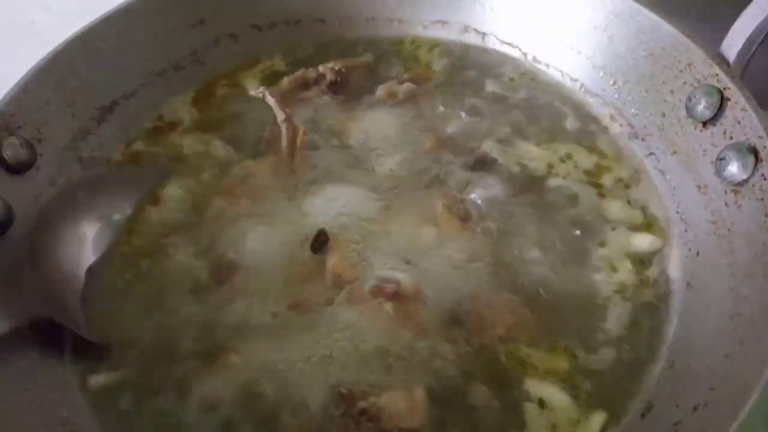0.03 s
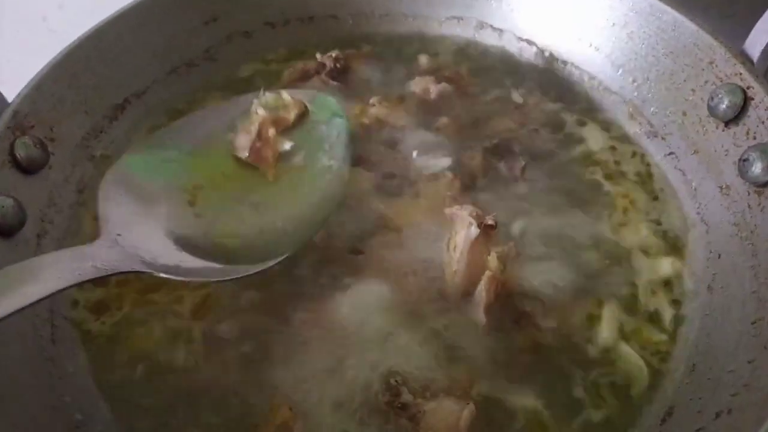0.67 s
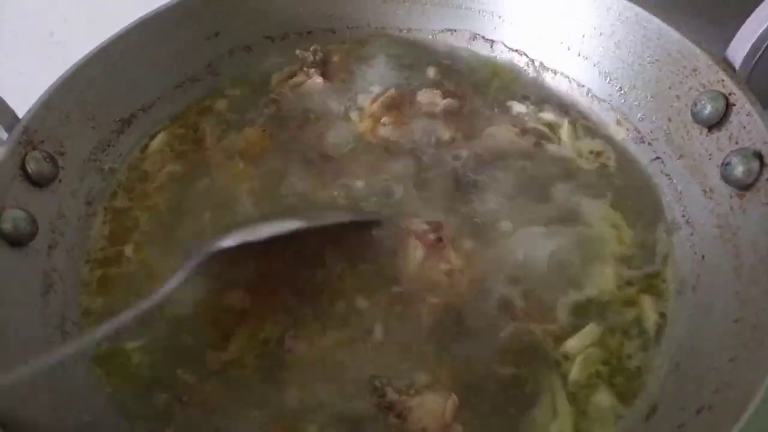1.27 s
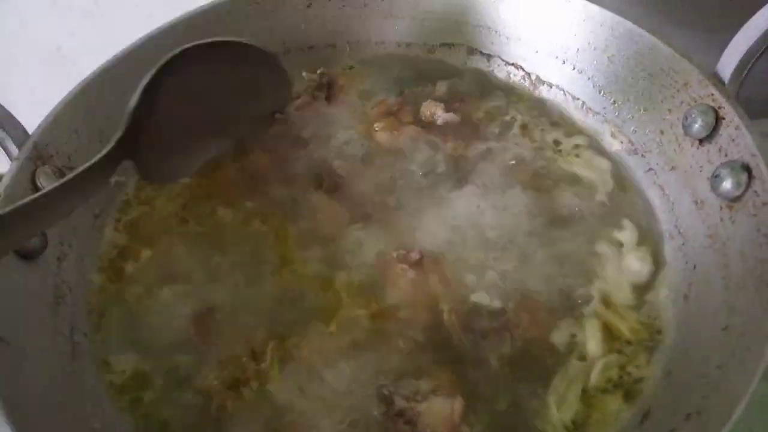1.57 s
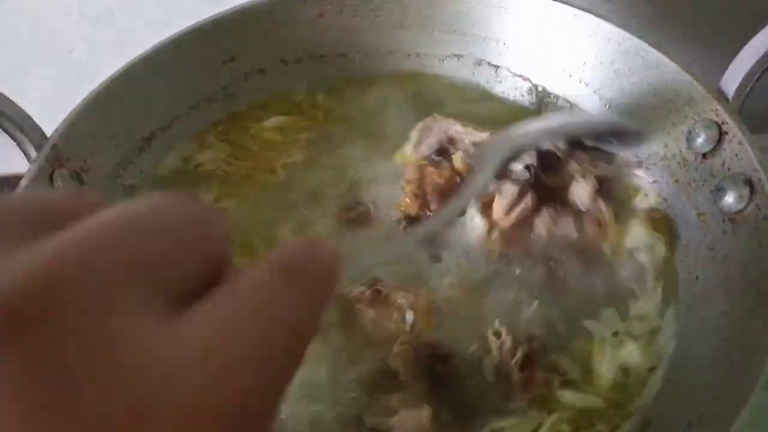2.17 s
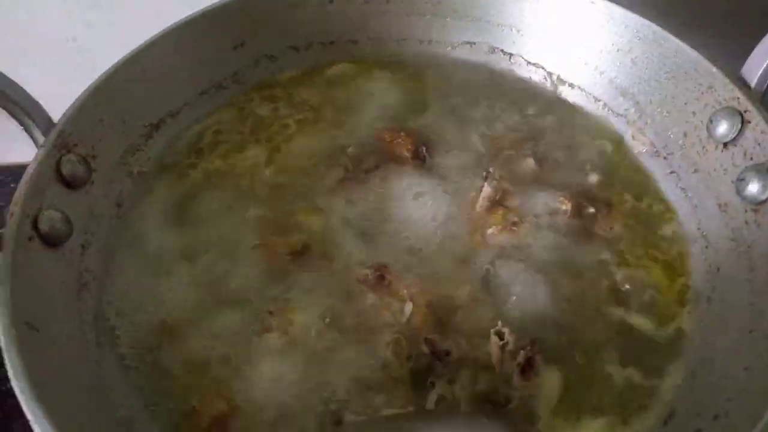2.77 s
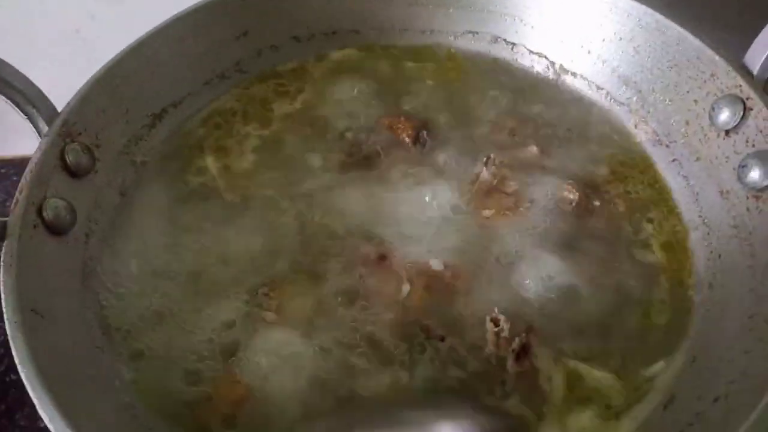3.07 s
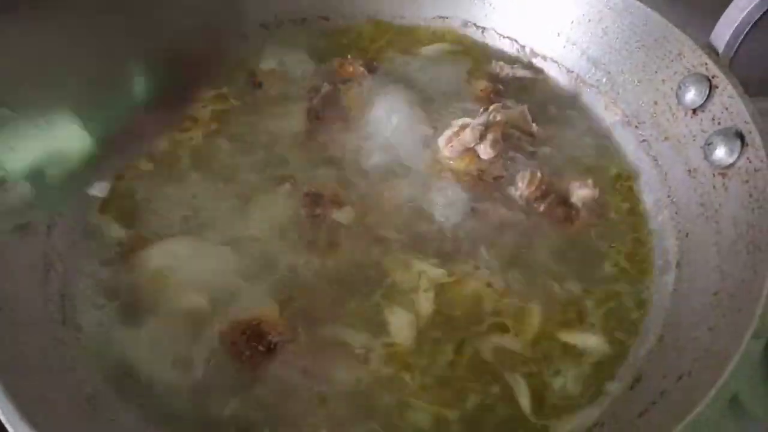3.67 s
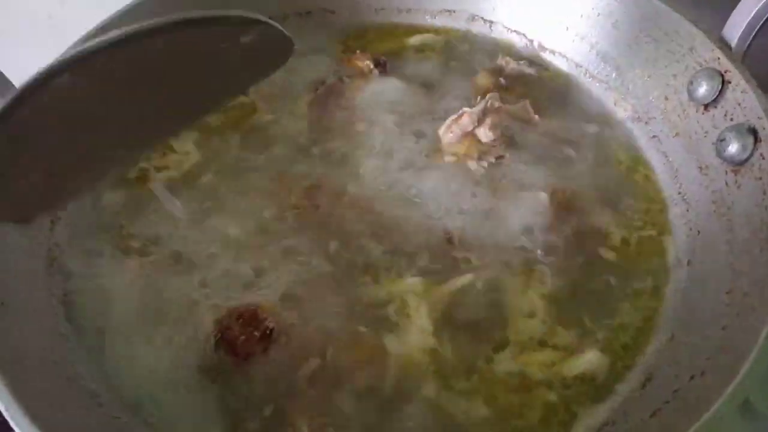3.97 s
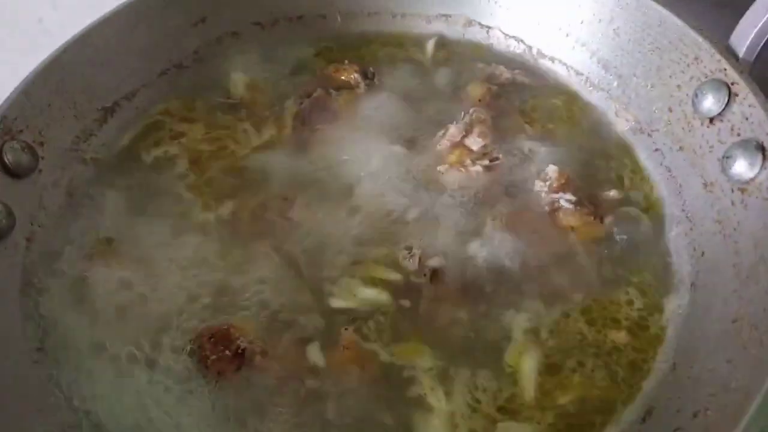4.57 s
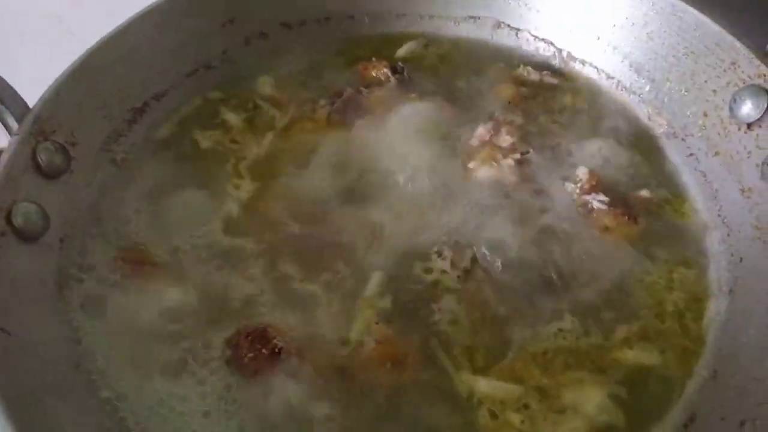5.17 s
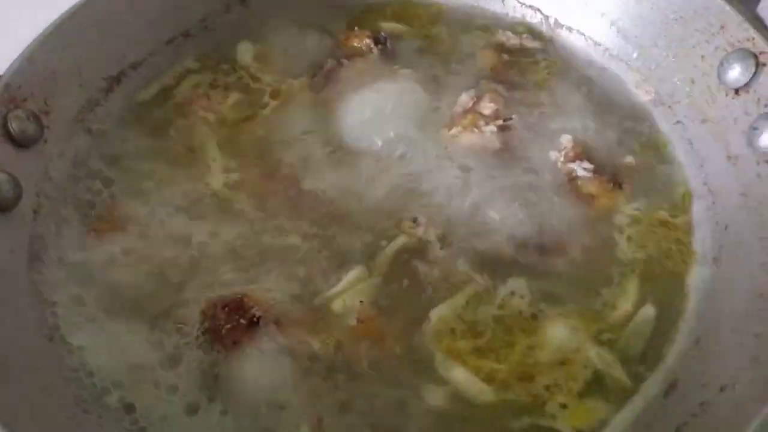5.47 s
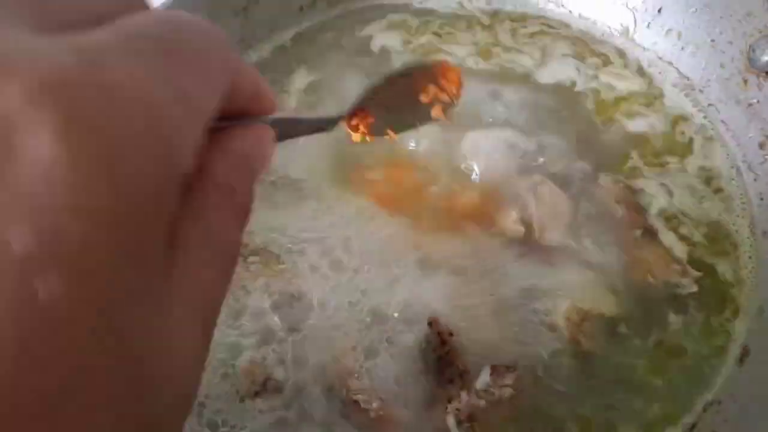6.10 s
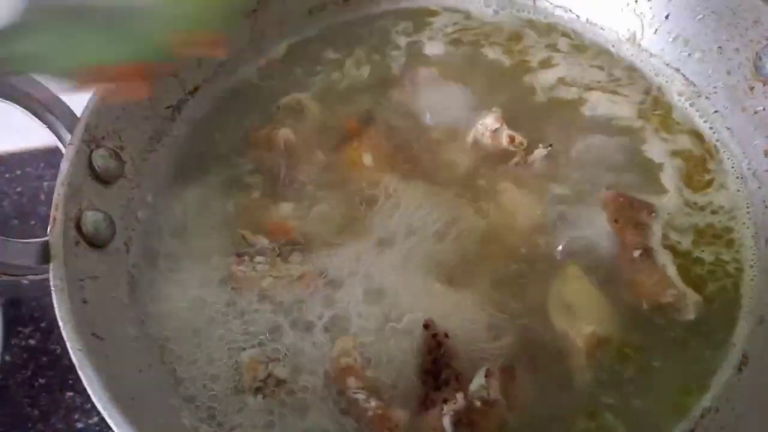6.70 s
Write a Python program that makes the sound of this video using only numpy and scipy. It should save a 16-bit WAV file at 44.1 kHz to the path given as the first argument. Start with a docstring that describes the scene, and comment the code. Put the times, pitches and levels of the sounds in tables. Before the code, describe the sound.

A low, churning bubble of soup boiling in a metal pan runs throughout, heard close up, with fizzing foam, small snaps and wet plops on top. Things are nudged quietly on the kitchen worktop. Past the middle comes the loudest sound, a metal spoon clanking down, followed by a lighter ringing utensil clatter. Faint distant chirps slide downward a few times, and a click starts a short low buzz near the end.

```python
"""Broth boils hard in a wide metal pan in a small kitchen: big steam bubbles rumble, fine foam fizzes and ticks, surface bubbles plop.
Beside the stove things are shifted about, a metal spoon is put down with a clank and another utensil clatters.
A few faint falling chirps come from further off, and near the end something buzzes briefly."""
import sys
import numpy as np
from scipy import signal
from scipy.fft import rfft, irfft, next_fast_len
from scipy.io import wavfile
from scipy.ndimage import uniform_filter1d

SR = 44100
rng = np.random.default_rng(int(sys.argv[2]) if len(sys.argv) > 2 else 0)


def bounce(signal):
    """Save signal as a 16-bit WAV file at the path given by the first command-line argument."""
    frames = np.transpose(np.atleast_2d(signal))
    limited = np.clip(frames, -1, 1)
    pcm = np.round(limited * 32767).astype(np.int16)
    wavfile.write(sys.argv[1], SR, pcm)


N = 306054

# vigour of the boil, as the level of its rumble: (s, dB)
BOIL = [(0.0, -62), (0.45, -58), (0.6, -61.5), (0.8, -57.5), (0.9, -65), (1.02, -56.5), (1.28, -59), (1.42, -66), (1.48, -56), (1.73, -62), (1.98, -55.5), (2.3, -59.5), (2.4, -65.5), (2.47, -58.5),
        (2.66, -63.5), (2.9, -58), (3.0, -61.5), (3.25, -60), (3.68, -61), (4.25, -57), (4.75, -59.5), (5.5, -61), (6.38, -57.5), (6.7, -70), (6.94, -78)]
# level of the foam's fizz: (s, dB)
FOAM = [(0.0, -68), (0.42, -72), (1.7, -66.5), (1.95, -71.5), (2.3, -67), (2.75, -69.5), (3.15, -67), (3.72, -71.5), (4.2, -69), (5.93, -67.5),
        (6.3, -67.5), (6.6, -66), (6.94, -71.5)]
# colours: (Hz, dB per Hz)
RUMBLE = [(30, -39), (55, -28.5), (85, -10.5), (115, -10.5), (140, -1), (178, 4.5), (203, -8.5), (235, -0.5), (275, -16.5), (330, -35), (600, -47.5), (1200, -84)]
FIZZ = [(1470, -51), (2500, -22), (3400, -23.5), (4500, -19.5), (5270, -3), (6500, 1.5), (7830, -7), (10200, -1.5), (11600, -4), (15200, -16), (16000, -6.5)]
FLAME = [(25, 15.5), (60, 19.5), (300, 7.5), (700, 2.5), (1500, -1), (3000, -3.5), (8000, -11.5), (16000, -13)]
# a clank's colour: (Hz, dB per Hz)
CLANK = [(50, -33), (130, -16), (290, -5), (480, -9.5), (650, -9.5), (1100, -15), (1450, -11), (2150, -11.5), (2900, -13), (3400, -7), (3800, -3.5), (4150, -15.5), (4900, -5), (7700, -8.5), (10500, -8.5), (16000, -18)]
CLATTER = [(240, -56), (400, -36), (512, -8.5), (742, -35), (949, -32), (994, -25), (1930, 2), (2290, -8.5),
           (3120, -13), (6440, 3), (7750, -14), (10500, -3.5), (16000, -7.5)]
# the loudest snaps in the foam: (s, peak dB, pitch Hz)
TICKS = [(0.1486, -47.5, 6400), (0.2633, -44.5, 5560), (0.2833, -49, 10600), (0.399, -51.5, 9800), (0.612, -42.5, 7300), (0.682, -47, 6550), (0.7063, -50, 6500), (0.9622, -54, 6100), (0.9792, -48, 11300), (1.1044, -45, 6700), (1.2441, -44.5, 9900),
         (1.3219, -52, 6600), (1.3568, -48, 5780), (1.5469, -43.5, 6600), (1.7509, -43.5, 6800), (1.9116, -49, 6600), (2.213, -43.5, 6500), (2.3511, -46, 6500),
         (2.4106, -43.5, 6550), (2.4229, -50, 6550), (2.5681, -51, 10100), (2.798, -47, 5830), (2.8389, -47, 7000), (2.9133, -46.5, 8800), (3.0071, -46.5, 6600), (3.1662, -48, 5570), (3.3827, -49, 6200),
         (4.0028, -54, 6630), (4.1046, -49, 6230), (4.185, -47, 7000), (4.964, -44, 5440), (5.1111, -51, 6310), (5.2837, -48.5, 6150), (5.3291, -49, 6160),
         (5.5835, -48.5, 6700), (5.8165, -48, 10150), (6.0973, -42.5, 9430), (6.5044, -39, 6050), (6.585, -46, 5750), (6.628, -45, 10700), (6.65, -45, 5560), (6.859, -44.5, 10170)]
# surface bubbles opening: (s, peak dB, pitch Hz)
PLOPS = [(0.184, -57.5, 1170), (0.193, -61.5, 1250), (0.203, -66, 1020), (0.589, -74.5, 1260), (1.169, -68, 1300), (1.41, -69.5, 1300), (1.746, -47, 1356),
         (1.782, -55, 1570), (2.442, -63.5, 1430), (2.46, -69, 1370), (3.286, -63, 905), (4.054, -57, 714), (5.078, -71, 1060), (6.537, -40.5, 1066), (6.61, -67, 880)]
# dishes shifted on the worktop: (s, length s, thud dB, note Hz, note dB, scrape dB)
SCUFFS = [(1.034, 0.13, -70, 453, -71, -78), (1.777, 0.0045, -63, 780, -68, -56), (1.789, 0.015, -62, 760, -64, -63), (2.043, 0.02, -65.5, 784, -66.5, -71), (2.068, 0.085, -68, 1310, -64.5, -67.5),
          (2.246, 0.016, -74, 800, -62, -67), (3.037, 0.026, -66, 480, -55.5, -52.5), (3.129, 0.11, -79, 1110, -65.5, -59.5),
          (3.801, 0.015, -74, 370, -67, -79), (3.923, 0.14, -69, 460, -79, -84), (4.024, 0.065, -54.5, 684, -78, -65),
          (4.298, 0.24, -58.5, 1120, -91, -60.5), (4.555, 0.011, -51.5, 1790, -55, -54.5), (4.584, 0.048, -55, 637, -62.5, -59.5), (4.81, 0.033, -65, 740, -57.5, -47),
          (4.962, 0.01, -54.5, 970, -83, -47.5), (5.074, 0.012, -58, 1060, -63, -57), (5.16, 0.1, -69, 557, -68.5, -71), (5.336, 0.038, -75, 1060, -68.5, -87), (5.399, 0.018, -56.5, 725, -72, -89),
          (5.657, 0.099, -70, 1110, -93, -69)]
# contacts of the spoon: (s, peak dB, brightness Hz, decay of the contact s)
SPOON_HITS = [(1.7825, -48.5, 6100, 0.0071), (4.209, -38, 9000, .003), (4.211, -22, 14000, 0.0029), (4.2124, -19.5, 15000, 0.0025), (4.2175, -22, 12000, 0.0015), (4.2313, -25, 1200, 0.0063), (4.2376, -26.5, 1004, 0.0045),
              (4.289, -40.5, 5000, 0.0057), (4.35, -42, 4500, 0.0079)]
# contacts of the second utensil: (s, peak dB, brightness Hz, decay of the contact s)
UTENSIL_HITS = [(4.785, -35, 9350, 0.0053), (4.792, -33.5, 12900, 0.0025), (4.803, -36.5, 9980, 0.0061), (4.810, -37.5, 14000, 0.011), (4.816, -41, 14300, 0.0064), (4.8215, -29.5, 8900, 0.0057)]
# the spoon's modes: (Hz, t60 s, dB)
SPOON_MODES = [(263, .08, -10), (480, 0.14, -6), (794, 0.16, -5.5), (1100, .13, -4), (1130, 0.092, -12), (1136, 0.095, 1), (1579, 0.12, -7), (1914, 0.089, -7.5), (2220, 0.15, -6.5),
               (3180, 0.13, -16), (3640, 0.13, -9), (3674, 0.23, -16.5), (3920, .17, -15), (4260, 0.075, -12.5), (4740, 0.14, -15), (4930, .18, -14), (5170, 0.13, -11.5), (5346, 0.18, -7.5), (5620, .16, -20), (6550, 0.1, -6.5), (7670, 0.11, -10.5), (8000, 0.15, -14.5),
               (8670, 0.12, 1), (8970, .16, -7), (9350, .12, -13.5), (10150, 0.081, -5.5), (10225, 0.24, 0.5), (11250, 0.12, -7.5), (11200, 0.17, -10), (11740, .12, -8.5), (14145, .09, -3.5), (15230, .13, -7.5)]
# the second utensil's modes: (Hz, t60 s, dB)
UTENSIL_MODES = [(760, 0.16, -23), (1950, 0.37, -11), (1974, 0.29, -6), (2150, 0.18, -9), (2616, 0.041, 2.5), (3910, 0.15, -5), (4985, 0.09, 1), (5450, 0.069, 1.5), (6010, 0.061, -10), (6600, 0.085, 6.5), (7080, 0.057, 1),
                 (7220, 0.14, -8), (8980, 0.32, -1.5), (9700, .12, -3), (10500, .17, -3.5), (11100, 0.21, 1), (11600, .1, -4.5), (13200, .12, -13), (14700, .1, -11)]
# distant chirps: (s, length s, start Hz, end Hz, level dB)
CHIRPS = [(2.253, 0.09, 5450, 2864, -58.5), (5.324, 0.094, 3770, 2390, -73.5), (5.659, 0.11, 3800, 2310, -71), (5.937, 0.075, 4010, 2595, -67.5)]
# the buzz's partials: (multiple, dB)
BUZZ_PARTIALS = [(1, -0.5), (2, -8.5), (3, -18), (4, -16.5), (5, -24)]
BUZZ_RATTLE = [(385, 190, -18.5), (575, 16, -28.5), (800, 74, -33), (1060, 19, -30)]   # (Hz, half width Hz, dB)
BUZZ_HZ, BUZZ_CLICK_S = 58.5, 6.024
KITCHEN_T60_S = 0.33
CUTOFF_HZ = 15900   # fixed
TIME = np.arange(N) / SR
BLUB_COLOUR = [(150, -23), (280, 4), (360, 2), (470, -4.5), (600, -11.5), (800, -22.5), (1500, -48), (4000, -74.5)]
# their resonances: (Hz, width Hz, dB)
DISH_MODES = [(1080, 190, -4), (1641, 130, -3.5), (1934, 65, -7), (2187, 220, -3.5), (2920, 320, -4), (3800, 110, -4), (4700, 320, -4.5)]
# dull bumps through the worktop: (s, level dB)
BUMPS = [(2.155, -79), (3.214, -61.5), (4.04, -54), (4.089, -58), (4.213, -53), (4.226, -45), (4.569, -51.5), (4.61, -52), (5.187, -60.5), (5.692, -60), (6.514, -57.5), (6.69, -63.5)]
# big bubbles that stand out of the churn: (s, peak dB, pitch Hz)
GLUGS = [(0.04, -52, 157), (0.047, -59, 348), (0.09, -65, 495), (0.4, -51, 173), (0.762, -62, 340), (0.766, -52, 220.7), (1.035, -50, 338), (1.041, -55, 184), (1.093, -55.5, 330), (1.17, -57, 199), (1.2, -67, 480),
         (1.47, -52, 228), (1.554, -46.5, 177.4), (1.649, -53.5, 234), (1.814, -55, 169), (1.84, -61, 476), (1.929, -56, 236), (2.047, -64, 495), (2.111, -47.5, 192), (2.246, -61, 514), (2.852, -57, 200),
         (3.038, -66, 501), (3.048, -51.5, 440), (3.097, -60, 430), (3.313, -53.5, 196), (3.358, -59, 346), (3.455, -58.5, 212), (3.804, -46.5, 217.5), (3.808, -53.5, 330), (3.878, -58.5, 343), (3.894, -52.5, 231),
         (4.341, -56, 172), (4.523, -51, 149.6), (4.56, -55, 550), (4.6, -58, 308), (4.845, -51, 170), (4.979, -52.5, 213), (5.079, -61, 397), (5.096, -56, 207), (5.17, -55, 362), (5.188, -69, 510), (5.213, -66, 447), (5.666, -64, 402), (5.795, -58.5, 163.5), (5.937, -55.5, 148), (6.068, -52, 298)]
SURGES_PER_S, SURGE_DB = 14, 1.36   # the boil heaves at random about its mean
BLUBS_DB, BLUBS_FOLLOW, BLUBS_SURGE_DB = -80.5, 0.24, 0.5   # smaller bubbles: level at mean vigour, share of the boil's swing, own surges
SMALL_TICKS_PER_S, SMALL_TICK_DB, SMALL_TICK_SPREAD_DB = 13, 12.5, 1   # lesser snaps come at random, their peaks this far over the foam
SMALL_TICK_HZ, SMALL_TICK_SPREAD_OCTAVES = 7640, 0.51
# the worktop's modes: (Hz, t60 s, dB)
WORKTOP_MODES = [(73.4, .12, -16.5), (111.5, 0.089, -8), (132.5, 0.27, 5.5), (163, 0.17, 1)]
BUZZ_START_S, BUZZ_ATTACK_S, BUZZ_STOP_S, BUZZ_RELEASE_S, BUZZ_DB = 6.004, 0.014, 6.375, 0.022, -50.5
# the level dips briefly
DIP_S, DIP_RECOVERY_S, DIP_DB = 5.999, .02, -20   # fixed
TICK_DECAY_S = 0.00095
TICK_DB = -3   # strength of every snap against its listed peak
# a dish is touched lightly and clinks; its modes: (Hz, t60 s, dB)
CLINK_S, CLINK_MODES = 3.808, [(1270, .25, -75), (1310, 0.17, -79), (1870, 0.072, -77), (1900, 0.092, -66.5), (1900, .09, -82)]
# level of the sizzle that comes in spurts below the fizz: (s, dB)
SIZZLE = [(0, -83), (.11, -81), (.2, -100), (.33, -87.5), (.5, -101.5), (.78, -88), (.95, -99), (1.24, -83.5), (1.5, -84), (1.68, -86), (1.97, -91), (2.2, -77),
          (2.7, -84), (3.0, -83), (3.25, -77), (3.45, -82), (3.75, -101), (3.92, -76), (4.1, -80), (4.5, -74.5), (5.2, -76), (5.4, -77), (5.9, -78.5), (6.15, -74), (6.26, -84.5), (6.55, -79.5), (6.94, -86)]
SIZZLE_COLOUR = [(2600, -28.5), (3300, -4), (3700, -4.5), (4300, -2.5), (4900, 1), (5600, -6.5), (7000, -43)]
# level of the bursting films' soft crackle: (s, dB)
CRACKLE = [(0, -84), (.3, -96), (.5, -99), (.95, -99), (1.1, -101), (1.42, -86.5), (1.6, -89), (1.95, -107), (2.4, -87.5), (2.9, -95.5), (3.4, -85), (3.7, -92.5),
           (5.2, -85), (5.9, -89.5), (6.15, -86), (6.6, -81), (6.94, -86.5)]
CRACKLE_COLOUR = [(400, 9), (800, -1), (1300, -5.5), (2200, -5.5), (3200, -5.5), (4500, -10)]
GLUG_DB, GLUG_SWELL_CYCLES = -3.5, 2.6   # strength of every glug against its listed peak; it swells for this many cycles
SMALL_GLUGS_PER_S, SMALL_GLUG_LOW_HZ, SMALL_GLUG_HIGH_HZ = 14, 220.7, 473   # lesser glugs come at random
SMALL_GLUG_DB, SMALL_GLUG_DB_PER_OCTAVE, SMALL_GLUG_SPREAD_DB = 1, -14.5, -0.5   # the lowest peak this far over the boil, higher ones are weaker
CONTACT_ATTACK_S = .0007   # a contact presses home this fast
BUZZ_WAVER_DB, BUZZ_WAVERS_PER_S = 2.5, 12   # each partial's level is unsteady
CHIRP_RASP = 1.0   # fixed
FIZZ_DULL_HZ = 12400   # after the dip the fizz loses its top above this
FOAM_SWELL_DB = 1.2   # fixed


def from_db(db):
    """Decibels to gain."""
    return 10 ** (np.asarray(db) / 20)


def rms_one(x):
    """Scale to unit rms."""
    return x / np.sqrt(np.mean(x ** 2) + 1e-20)


def level(rows):
    """Gain over time from rows of (s, dB)."""
    return from_db(np.interp(TIME, *np.transpose(rows)))


def colour(x, spectrum):
    """Give a white sound a smooth spectrum, keeping its power; minimum phase, so nothing sounds early."""
    half, (hz, db) = next_fast_len(N // 2 + SR // 10), np.transpose(spectrum)
    gain = rms_one(from_db(np.interp(np.log(np.linspace(1, SR / 2, half + 1)), np.log(hz), db)))
    cepstrum = irfft(np.log(gain))
    cepstrum[1:half] *= 2
    cepstrum[half + 1:] = 0
    return irfft(rfft(x, 2 * half) * np.exp(rfft(cepstrum)))[:N]


def band(x, low_hz, high_hz):
    """Band-pass that keeps the power of white noise."""
    edges = np.clip([low_hz, high_hz], 10, .45 * SR)  # fixed
    return signal.sosfilt(signal.butter(2, edges, "band", fs=SR, output="sos"), x + 1e-18) * np.sqrt(SR / 2 / (edges[1] - edges[0]))


def drift(rate):
    """Slow random wander of spread 1."""
    knots = rng.standard_normal(int(rate * N / SR) + 2)
    return rms_one(np.interp(TIME * rate, np.arange(len(knots)), knots))


def ring(clicks, hz, t60):
    """A unit click sets a sine of height 1 ringing."""
    r, w = np.exp(-np.log(1000) / (t60 * SR)), 2 * np.pi * hz / SR
    return signal.lfilter([0, np.sin(w)], [1, -2 * r * np.cos(w), r * r], clicks + 1e-18)


def add(track, s, sound):
    """Mix a short sound into a track at time s."""
    at = round(s * SR)
    track[at:at + len(sound)] += sound[:N - at]


def diffuse(x, t60):
    """Countless echoes or close modes: a dense dying tail of the same energy."""
    t = TIME[TIME < t60]
    tail = rng.standard_normal(len(t)) * np.exp(-np.log(1000) * t / t60)
    return signal.oaconvolve(x, tail / np.linalg.norm(tail))[:N]


def bubbles(per_s, low_hz, high_hz, cycles, spread_db, clump_db, count=24):
    """Bubbles are born in random clumps, each ringing a few cycles at its own pitch; flat spectrum, rms 1."""
    born = np.flatnonzero(rng.random(N) < per_s * from_db(clump_db * drift(25)) / SR)
    sizes = from_db(spread_db * np.minimum(rng.exponential(1, N), 4.5)) * rng.choice([-1, 1], N)
    dealt, out = rng.integers(0, count, N), np.zeros(N)
    for k, hz in enumerate(np.geomspace(low_hz, min(high_hz, .45 * SR), count)):
        clicks = np.zeros(N)
        clicks[born] = sizes[born] * (dealt[born] == k)
        out += hz * ring(clicks, hz, cycles / hz)
    return rms_one(out)


def rolling_boil(pan_hz=179, pan_width_hz=12, churn_db=3):
    """Large steam bubbles keep up a heaving churn and make the pan drone; smaller ones blub above it, following its vigour."""
    vigour, surge = level(BOIL), drift(SURGES_PER_S)
    churn = colour(bubbles(per_s=520, low_hz=70.8, high_hz=330, cycles=16.1, spread_db=2, clump_db=2, count=30), RUMBLE)
    churn = churn + from_db(-5.0) * signal.lfilter(*signal.iirpeak(pan_hz, pan_hz / pan_width_hz, fs=SR), churn)
    churn = churn / np.sqrt(uniform_filter1d(churn ** 2, size=2400) + 1e-12)
    blubs = colour(bubbles(per_s=330, low_hz=268.5, high_hz=773, cycles=85, spread_db=3.5, clump_db=2.5), BLUB_COLOUR)
    blub_gain = from_db(BLUBS_DB + BLUBS_SURGE_DB * drift(SURGES_PER_S)) * (vigour / vigour.mean()) ** BLUBS_FOLLOW
    return from_db(SURGE_DB * surge) * (vigour * churn + blub_gain * rms_one(blubs))


def foam():
    """Tiny bubbles crackle, high and thin, over a smooth hiss; duller after the dip."""
    grains = bubbles(per_s=1900, low_hz=4680, high_hz=15000, cycles=20, spread_db=4.5, clump_db=2.5)
    grains = signal.sosfilt(signal.butter(4, 4200, "high", fs=SR, output="sos"), grains)
    hiss = from_db(2.0) * rng.standard_normal(N) * from_db(2.0 * drift(45) + FOAM_SWELL_DB * drift(6.5))
    fizz = rms_one(colour(grains + hiss, FIZZ))
    dull = signal.sosfilt(signal.butter(2, min(FIZZ_DULL_HZ, .45 * SR), fs=SR, output="sos"), fizz)
    return level(FOAM) * np.where(TIME < DIP_S, fizz, dull)


def ticks(snap_db=-3, ring_db=-5, attack_s=0.0005, low_share=0.82, high_share=1.3):
    """A film snaps: a very short, thin crack around its own pitch, with a brief ring."""
    out, t = np.zeros(N), TIME[:700]
    shape = (1 - np.exp(-t / attack_s)) * np.exp(-t / TICK_DECAY_S)
    for s, db, hz in list(TICKS) + small_ticks():
        crack = shape * (from_db(snap_db) * band(rng.standard_normal(len(t)), hz * low_share, hz * high_share) + from_db(ring_db) * np.sin(2 * np.pi * hz * t))
        add(out, s, from_db(db + TICK_DB) * crack * np.linalg.norm(shape) / np.linalg.norm(crack))
    return signal.sosfilt(signal.butter(6, 4400, "high", fs=SR, output="sos"), out + 1e-18)


def plops(swell_s=0.0014, close_s=0.00057, rise_per_s=45, wet_db=-19, wet_s=0.014):
    """A dome tears open: its cavity note swells and climbs as the hole widens; the film then splashes back."""
    out, t = np.zeros(N), TIME[:3000] - TIME[350]
    for s, db, hz in PLOPS:
        phase = 2 * np.pi * np.cumsum(hz * np.exp(rise_per_s * np.minimum(t, .004))) / SR
        shape = 1.74 / (np.exp(-t / swell_s) + np.exp(t / close_s))
        splash = band(rng.standard_normal(len(t)), hz * 0.72, hz * 1.12) * (t > 0) * np.exp(-np.abs(t) / wet_s)
        add(out, s - .0062, from_db(db) * (shape * np.sin(phase) + from_db(wet_db) * splash))
    return out


def scuffs():
    """Dishes bump and slide on the worktop: gritty contact rings a hollow note and their modes, heard both
    close by and through the room."""
    out, t = np.zeros(N), TIME[:SR // 2]
    for s, length, thud_db, note_hz, note_db, scrape_db in SCUFFS:
        grit = rng.standard_normal((3, len(t))) * np.exp(-(t / length) ** 2)
        thud = from_db(thud_db) * band(grit[0], 240, 473)
        note = from_db(note_db) * band(grit[1], note_hz * 0.894, note_hz * 1.13)
        scrape = sum((-1) ** k * from_db(db + scrape_db - 9.0) * resonate(grit[2], hz, width) for k, (hz, width, db) in enumerate(DISH_MODES))
        add(out, s, thud + note + scrape)
    return from_db(-6.5) * out + from_db(-7.5) * diffuse(out, KITCHEN_T60_S)


def struck_metal(hits, modes, spectrum, crack_db, ring_db, wash_db, wash_t60, room_db):
    """Each contact gives a rough crack and rings the modes; softer contacts are duller."""
    cracks, clicks, t = np.zeros(N), np.zeros(N), TIME[:3000]
    for s, db, bright_hz, crack_s in hits:
        soft = signal.butter(2, min(bright_hz, .45 * SR), fs=SR)
        add(cracks, s, from_db(db) * signal.lfilter(*soft, rng.standard_normal(len(t)) * (1 - np.exp(-t / CONTACT_ATTACK_S)) * np.exp(-t / crack_s)))
        add(clicks, s, from_db(db) * signal.lfilter(*soft, t == 0))
    cracks = colour(cracks, spectrum)
    rings = sum((-1) ** k * from_db(db + ring_db) * ring(clicks, hz, t60) for k, (hz, t60, db) in enumerate(modes))
    near = from_db(crack_db) * cracks + rings + from_db(wash_db) * diffuse(cracks, wash_t60)
    walls = signal.sosfilt(signal.butter(2, 7500, fs=SR, output="sos"), near)   # the walls swallow the top
    return near + from_db(room_db) * diffuse(walls, KITCHEN_T60_S)


def chirps(rough=0.038, direct_db=-0.5, room_db=-2.5):
    """Short, broken, raspy falling chirps, smeared by the walls."""
    out = np.zeros(N)
    for s, length, start_hz, end_hz, db in CHIRPS:
        u = np.minimum(TIME[:SR // 5] / length, 1)
        hz = (end_hz + (start_hz - end_hz) * (1 - u) ** 1.6) * (1 + rough * band(rng.standard_normal(len(u)), 50, 390))
        rasp = rms_one(1 + CHIRP_RASP * band(rng.standard_normal(len(u)), 30, 270))
        add(out, s, from_db(db) * rasp * np.sqrt(np.abs(np.sin(np.pi * u ** 0.85))) * np.sin(2 * np.pi * np.cumsum(hz) / SR))
    return from_db(direct_db) * out + from_db(room_db) * diffuse(out, t60=0.38)


def buzz():
    """A low buzz starts with a click, holds while rattling faintly on each cycle, and dies away."""
    phase = 2 * np.pi * BUZZ_HZ * TIME
    hum = sum(np.sqrt(2) * from_db(db + BUZZ_WAVER_DB * np.log2(2 * k) / 2 * drift(BUZZ_WAVERS_PER_S)) * np.sin(k * phase + rng.uniform(0, 2 * np.pi)) for k, db in BUZZ_PARTIALS)
    grit = rng.standard_normal(N) * (1 + 0.28 * np.sin(phase))
    rattle = sum(from_db(db) * band(grit, hz - width, hz + width) for hz, width, db in BUZZ_RATTLE)
    envelope = np.clip((TIME - BUZZ_START_S) / BUZZ_ATTACK_S, 0, 1) * np.exp(-np.maximum(TIME - BUZZ_STOP_S, 0) / BUZZ_RELEASE_S)
    out = from_db(BUZZ_DB) * envelope * (hum + rattle)
    add(out, BUZZ_CLICK_S, -from_db(-38) * np.exp(-TIME[:900] / 0.0023))
    return out


def resonate(x, hz, width_hz):
    """A resonance that keeps the power of white noise."""
    return signal.lfilter(*signal.iirpeak(hz, hz / width_hz, fs=SR), x + 1e-18) * np.sqrt(SR / (np.pi * width_hz))


def spread(x, side_db, top_db):
    """The two microphone ports differ only in the treble, most at the very top, by a wandering phase."""
    size = next_fast_len(N + SR // 10)
    hz = np.linspace(0, SR / 2, size // 2 + 1)
    depth = from_db(np.interp(hz, [3900, 4400, 11500, 13500], [-80, side_db, side_db, top_db]))  # fixed
    side = irfft(1j * depth * rfft(x, size), size)[:N] * np.tanh(2 * drift(200))
    return x + side * np.array([[1], [-1]])


def bumps():
    """Soft pushes set the worktop's lowest modes thudding."""
    pushes = np.zeros(N)
    for s, db in BUMPS:
        add(pushes, s, from_db([db]))
    thuds = sum(from_db(db) * ring(pushes, hz, t60) for hz, t60, db in WORKTOP_MODES)
    return signal.sosfilt(signal.butter(3, [72, 180], "band", fs=SR, output="sos"), thuds)


def glugs(rise_per_s=0.8):
    """A big bubble breaks away, swells and rings, its note rising as it nears the surface; bigger ones take longer."""
    out, t = np.zeros(N), TIME[:SR // 6]
    for s, db, hz in list(GLUGS) + small_glugs():
        age = t * hz / GLUG_SWELL_CYCLES
        add(out, s, from_db(db + GLUG_DB) * age * np.exp(1 - age) * np.sin(2 * np.pi * hz * t * (1 + rise_per_s * t)))
    return out


def small_ticks():
    """Lesser snaps at random moments, as strong as the foam is lively: rows like those of TICKS."""
    chance = rng.standard_normal((200, 2))
    times = np.cumsum(rng.exponential(1 / SMALL_TICKS_PER_S, len(chance)))
    db = np.interp(times, *np.transpose(FOAM)) + SMALL_TICK_DB + SMALL_TICK_SPREAD_DB * chance[:, 0]
    hz = SMALL_TICK_HZ * 2 ** (SMALL_TICK_SPREAD_OCTAVES * chance[:, 1])
    return list(np.transpose([times, db, hz])[times < TIME[-1]])


def dip(before_db=5):
    """The level drops at once, then comes back quickly and settles a little lower than before."""
    recovered = np.clip((TIME - DIP_S) / DIP_RECOVERY_S, 0, 1)
    return from_db(np.where(TIME < DIP_S, before_db, DIP_DB * (1 - recovered)))


def clink():
    """A light touch rings a dish, heard half through the room."""
    touch = np.zeros(N)
    add(touch, CLINK_S, [1])
    rings = sum(from_db(db) * ring(touch, hz, t60) for hz, t60, db in CLINK_MODES)
    return from_db(-10.0) * rings + from_db(-2.5) * diffuse(rings, KITCHEN_T60_S)


def sizzle(hiss_db=-3, spurt_db=2):
    """Broth spits against the hot rim in little spurts of tiny bubbles."""
    grains = bubbles(per_s=970, low_hz=3030, high_hz=5420, cycles=25, spread_db=1.0, clump_db=4.5, count=12)
    hiss = from_db(hiss_db) * band(rng.standard_normal(N), 3000, 6000) / np.sqrt(2)
    return level(SIZZLE) * rms_one(colour(grains + hiss, SIZZLE_COLOUR) * from_db(spurt_db * drift(22)))


def crackle():
    """Films of middling size burst all over the surface: a soft, wet crackle."""
    grains = bubbles(per_s=130, low_hz=520, high_hz=3600, cycles=18, spread_db=1.0, clump_db=5.0, count=18)
    return level(CRACKLE) * rms_one(colour(grains, CRACKLE_COLOUR))


def small_glugs():
    """Lesser glugs at random moments, as strong as the boil is lively: rows like those of GLUGS."""
    chance = rng.random((200, 3))
    times = np.cumsum(-np.log(1 - chance[:, 0]) / SMALL_GLUGS_PER_S)
    octaves = chance[:, 1] * np.log2(SMALL_GLUG_HIGH_HZ / SMALL_GLUG_LOW_HZ)
    db = np.interp(times, *np.transpose(BOIL)) + SMALL_GLUG_DB + SMALL_GLUG_DB_PER_OCTAVE * octaves + SMALL_GLUG_SPREAD_DB * (2 * chance[:, 2] - 1)
    return list(np.transpose([times, db, SMALL_GLUG_LOW_HZ * 2 ** octaves])[times < TIME[-1]])


def scene():
    """The pan close by, the worktop beside it, the flame beneath."""
    pops = ticks() + plops()
    pan = rolling_boil() + glugs() + foam() + sizzle() + crackle() + pops + from_db(-4.0) * diffuse(pops, t60=0.026)
    spoon = struck_metal(SPOON_HITS, SPOON_MODES, CLANK, crack_db=-4.5, ring_db=-19.0, wash_db=-13.5, wash_t60=0.39, room_db=-9.0)
    utensil = struck_metal(UTENSIL_HITS, UTENSIL_MODES, CLATTER, crack_db=-3.0, ring_db=-22.0, wash_db=-13.5, wash_t60=0.35, room_db=-7.0)
    flame = from_db(-83.5) * colour(rng.standard_normal(N), FLAME)
    close = spread(pan, side_db=-32.5, top_db=-4.5) + spread(spoon, side_db=-10, top_db=-0.5) + spread(utensil, side_db=-22, top_db=0)
    return (close + scuffs() + clink() + bumps() + chirps() + buzz() + flame) * dip()


def record(dry):
    """The top is cut steeply."""
    return signal.sosfilt(signal.ellip(12, .1, 80, CUTOFF_HZ, fs=SR, output="sos"), dry)


dry = scene()
out = record(dry)
bounce(out)
```